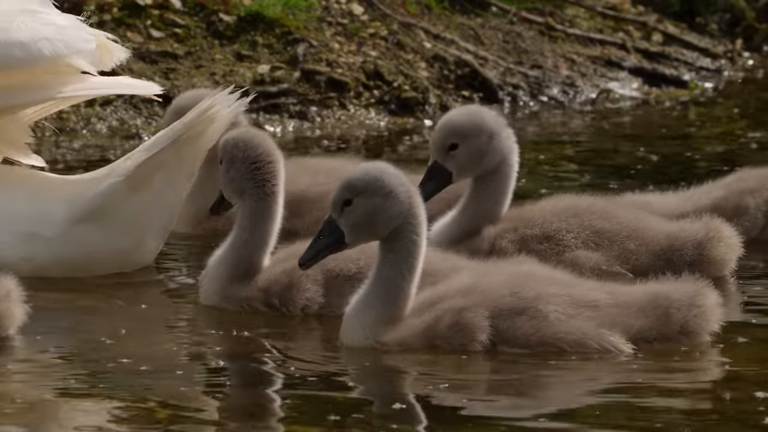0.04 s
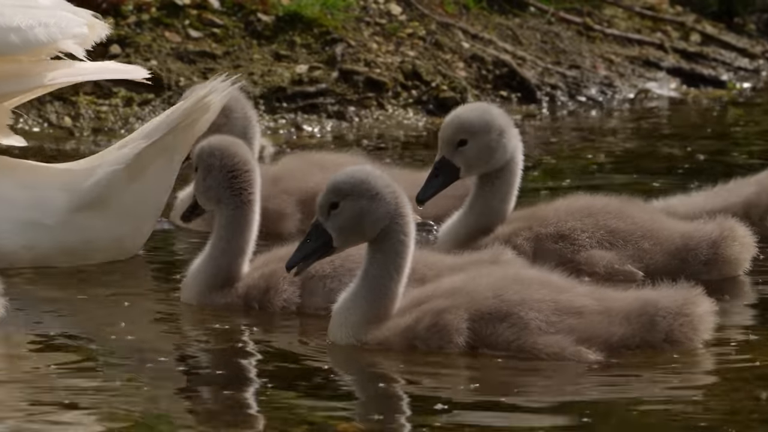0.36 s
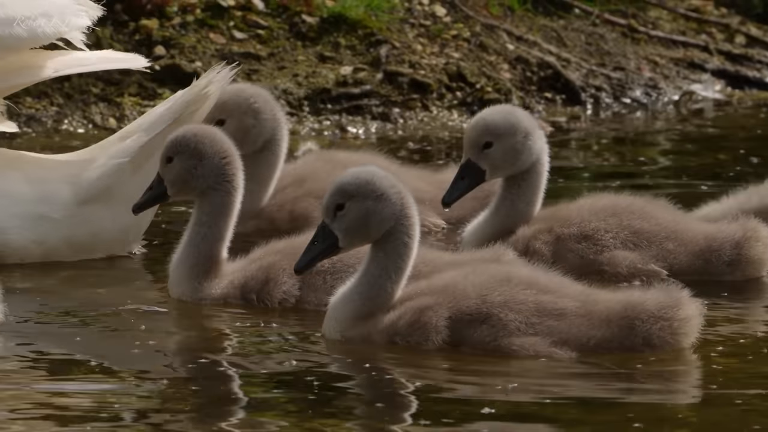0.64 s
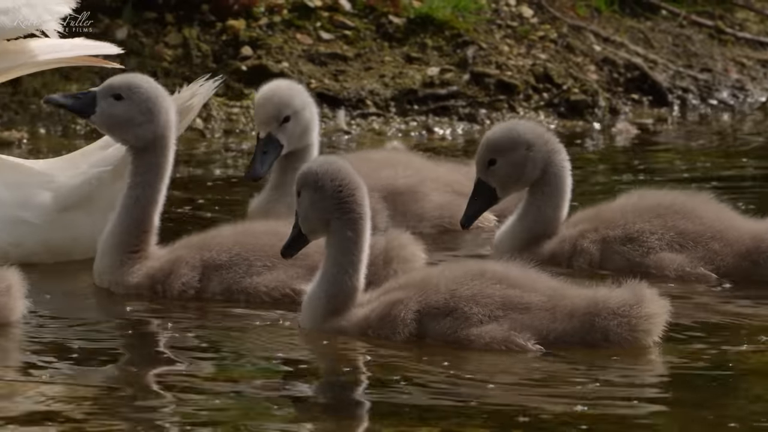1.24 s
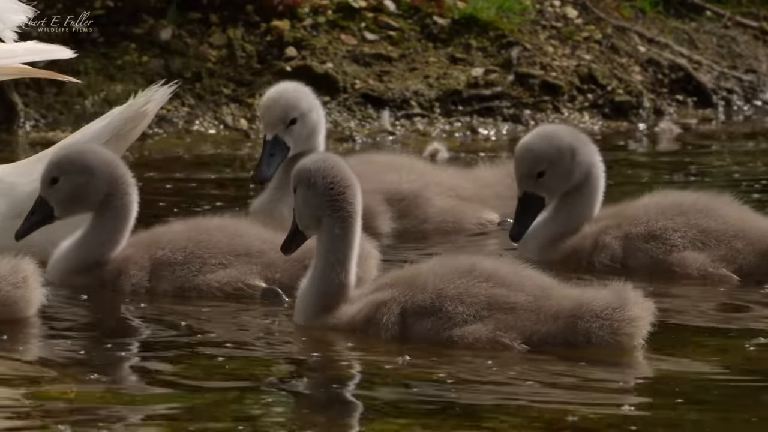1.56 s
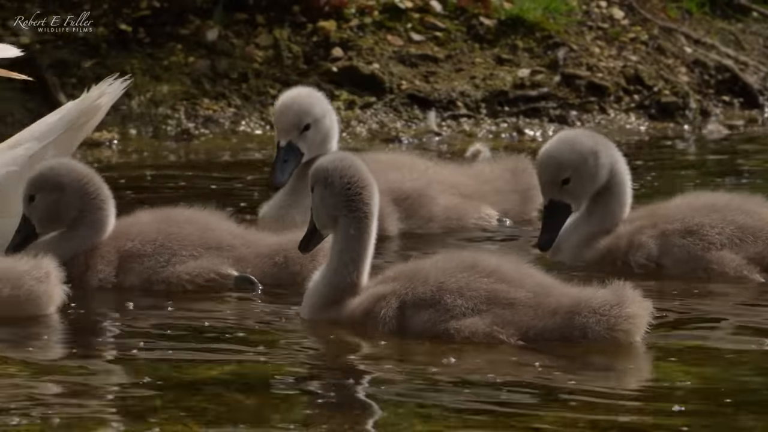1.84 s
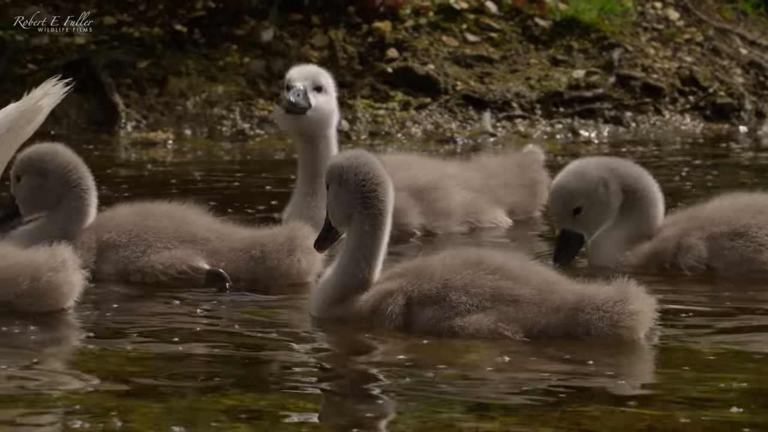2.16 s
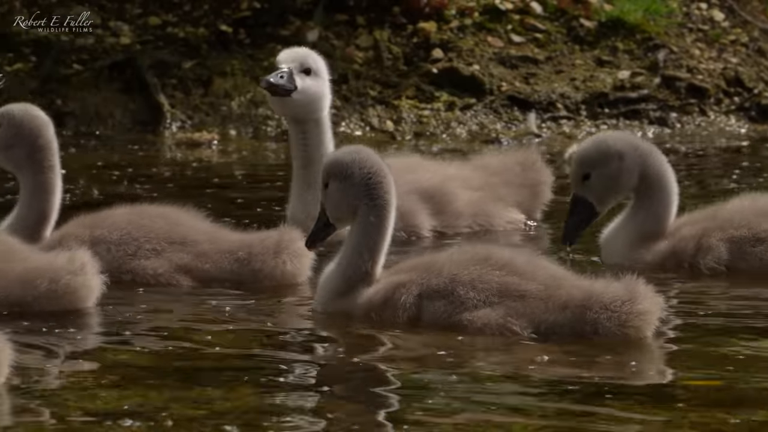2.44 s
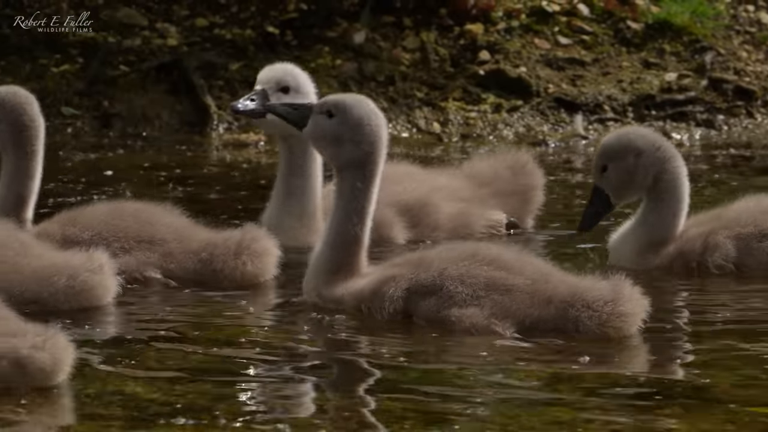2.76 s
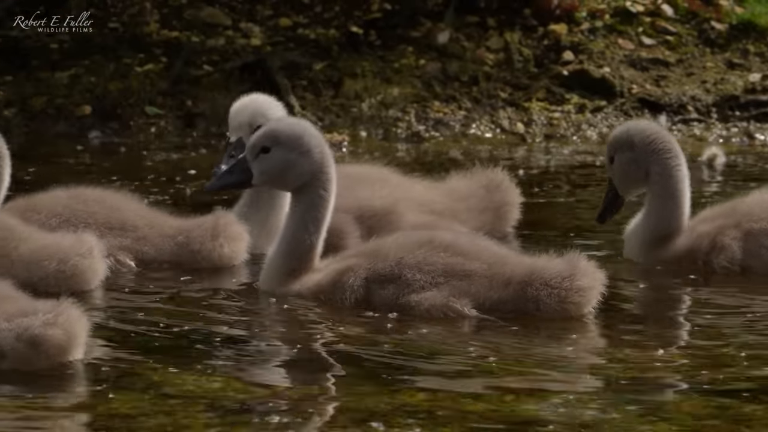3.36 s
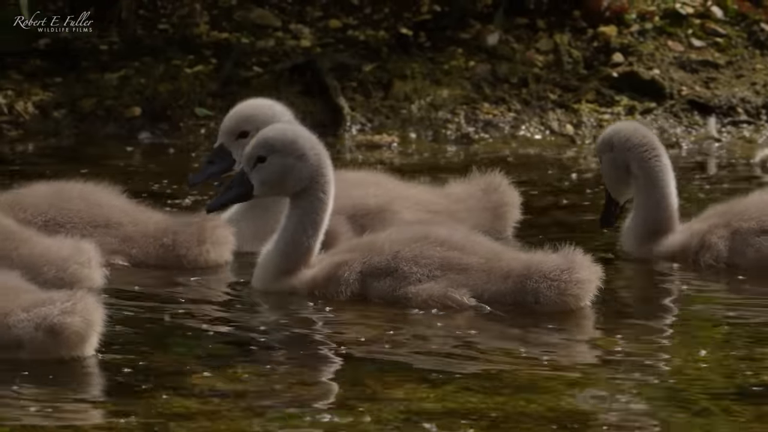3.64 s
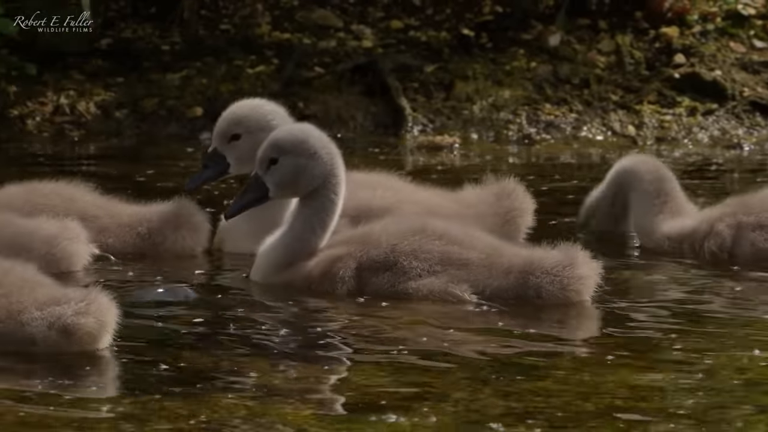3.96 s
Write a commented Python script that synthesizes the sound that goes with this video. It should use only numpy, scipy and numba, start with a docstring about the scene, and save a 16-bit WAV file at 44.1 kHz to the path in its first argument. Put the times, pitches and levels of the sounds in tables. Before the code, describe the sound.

Swan chicks peep throughout in short, high, overlapping whistles close to the microphone. An adult swan grunts twice early on, then tiny drips tick in the water. Faint distant songbirds and soft open air lie behind.

```python
"""A brood of cygnets paddles by a river bank, peeping over one another from start to end in short
arched whistles, nearly pure tones of which a few are held. In the first second an adult swan grunts
twice, as uneven pulses excite the resonance of its throat. Next some peeps crack into half tones
(subharmonics), and from 1.3 s small drips ring as bubbles. Far songbirds whistle on and off, joined
at 1.8 s by husky rising calls. The soft wash of the open air lies under it all."""
import sys
import numpy as np
from scipy import signal
from scipy.fft import rfft, irfft
from scipy.io import wavfile
from scipy.ndimage import map_coordinates
from numba import njit

SR = 44100
rng = np.random.default_rng(int(sys.argv[2]) if len(sys.argv) > 2 else 0)


def unload_wav(signal):
    """Save mono or channel-first audio to the path in sys.argv[1] as 16-bit WAV at rate SR, clipped to [-1, 1]."""
    wavfile.write(
        sys.argv[1],
        SR,
        np.round(np.clip(np.atleast_2d(signal).T, -1, 1) * 32767).astype(np.int16),
    )


N = 176400

# Arched peeps: start t/s, rise t/s, fall t/s, first f/Hz, crest f/Hz, last f/Hz, rise exponent,
# fall exponent, crest level before the swell/dB, swell/dB, second harmonic/dB, voice crack/(0-1)
PEEPS = [(0.141, 0.014, 0.069, 2410.0, 2730.0, 2010.0, 1.9, 1.9, -32.0, 10.0, -30.0, 0),
         (0.364, 0.033, 0.079, 2480.0, 2790.0, 1930.0, 3.3, 1.0, -34.0, 9.0, -22.0, 0),
         (0.61, 0.008, 0.051, 2100.0, 2650.0, 2050.0, 1.5, 1.5, -30.0, 7.0, -36.0, 0),
         (0.632, 0.027, 0.071, 2260.0, 2720.0, 1980.0, 1.8, 2.1, -36.0, 14.0, -26.0, 0),
         (0.791, 0.011, 0.052, 2340.0, 2840.0, 2380.0, 2.3, 1.3, -27.0, 5.0, -36.0, 0),
         (0.916, 0.019, 0.063, 2380.0, 2630.0, 1990.0, 2.0, 1.4, -35.0, 19.0, -27.0, 0),
         (0.977, 0.008, 0.069, 2420.0, 2920.0, 2220.0, 1.0, 2.7, -27.0, 10.0, -35.0, 0.8),
         (1.094, 0.027, 0.023, 1820.0, 1960.0, 1840.0, 1.6, 2.1, -48.0, 1.0, -33.0, 0),
         (1.156, 0.035, 0.067, 2200.0, 2940.0, 2190.0, 2.2, 2.5, -28.0, 7.0, -32.0, 0.5),
         (1.241, 0.035, 0.024, 1880.0, 2150.0, 1920.0, 1.2, 1.7, -40.0, 2.0, -36.0, 0),
         (1.358, 0.044, 0.081, 2250.0, 2940.0, 2010.0, 1.7, 2.4, -30.0, 7.0, -22.0, 1),
         (1.381, 0.047, 0.026, 1930.0, 2530.0, 1910.0, 1.0, 1.1, -35.0, -1.0, -36.0, 0),
         (1.521, 0.053, 0.028, 1880.0, 2810.0, 1920.0, 1.6, 1.5, -41.0, -7.0, -29.0, 0),
         (1.6, 0.047, 0.092, 1930.0, 2890.0, 2070.0, 2.0, 2.4, -30.0, 11.0, -26.0, 1),
         (1.669, 0.054, 0.029, 1850.0, 2830.0, 1920.0, 1.7, 1.1, -40.0, -0.0, -36.0, 0),
         (1.773, 0.01, 0.028, 2330.0, 2350.0, 2120.0, 1.6, 1.9, -50.0, 0.0, -36.0, 0),
         (1.824, 0.042, 0.032, 1860.0, 2820.0, 1850.0, 1.2, 1.7, -40.0, -6.0, -36.0, 0),
         (1.836, 0.053, 0.015, 2020.0, 2250.0, 2090.0, 1.0, 2.2, -41.0, 6.0, -36.0, 0),
         (1.943, 0.007, 0.051, 2790.0, 2960.0, 2160.0, 1.1, 1.4, -33.0, 0.0, -36.0, 0),
         (1.984, 0.084, 0.033, 2120.0, 2720.0, 2130.0, 1.9, 2.2, -35.0, 2.0, -36.0, 0),
         (2.021, 0.02, 0.044, 2130.0, 2170.0, 2000.0, 1.7, 1.8, -42.0, 11.0, -30.0, 0),
         (2.121, 0.006, 0.054, 2870.0, 3020.0, 2170.0, 1.5, 2.2, -34.0, 3.0, -25.0, 0),
         (2.178, 0.079, 0.034, 2350.0, 2800.0, 1910.0, 1.7, 2.3, -36.0, 0.0, -32.0, 0),
         (2.298, 0.006, 0.05, 2750.0, 3120.0, 2400.0, 1.0, 1.8, -31.0, 4.0, -23.0, 0),
         (2.38, 0.093, 0.031, 2180.0, 2780.0, 1880.0, 2.3, 1.4, -38.0, 5.0, -33.0, 0),
         (2.492, 0.005, 0.055, 2610.0, 3080.0, 2310.0, 1.0, 2.0, -32.0, 4.0, -23.0, 0),
         (2.543, 0.053, 0.017, 1780.0, 2030.0, 1910.0, 1.6, 2.1, -53.0, 7.0, -22.0, 0),
         (2.614, 0.061, 0.029, 2130.0, 2800.0, 1940.0, 1.7, 2.9, -50.0, 8.0, -23.0, 0),
         (2.623, 0.023, 0.025, 1900.0, 2110.0, 1920.0, 1.7, 1.6, -45.0, 2.0, -27.0, 0),
         (2.723, 0.013, 0.051, 2800.0, 2870.0, 2160.0, 1.8, 1.3, -36.0, 3.0, -36.0, 0),
         (2.732, 0.054, 0.031, 1940.0, 2720.0, 1900.0, 1.2, 1.0, -38.0, -0.0, -36.0, 0),
         (2.877, 0.05, 0.034, 1940.0, 2820.0, 1860.0, 1.1, 1.3, -41.0, -7.0, -35.0, 0),
         (2.901, 0.07, 0.027, 2000.0, 2520.0, 1860.0, 1.3, 1.8, -42.0, 3.0, -34.0, 0),
         (2.99, 0.022, 0.049, 2620.0, 3080.0, 2530.0, 2.3, 2.2, -33.0, 5.0, -32.0, 0),
         (3.003, 0.049, 0.025, 1980.0, 2200.0, 2010.0, 1.2, 1.8, -43.0, 4.0, -31.0, 0),
         (3.032, 0.042, 0.032, 2070.0, 2750.0, 1940.0, 1.4, 1.0, -42.0, 3.0, -33.0, 0),
         (3.088, 0.065, 0.033, 2010.0, 2580.0, 1970.0, 1.2, 2.8, -41.0, 2.0, -30.0, 0),
         (3.141, 0.05, 0.041, 2060.0, 2370.0, 2050.0, 1.5, 1.6, -39.0, 5.0, -32.0, 0),
         (3.164, 0.041, 0.032, 2330.0, 2540.0, 2010.0, 1.0, 1.7, -40.0, -8.0, -35.0, 0),
         (3.194, 0.052, 0.018, 2020.0, 2260.0, 1870.0, 1.1, 1.6, -44.0, 5.0, -32.0, 0),
         (3.289, 0.065, 0.04, 2010.0, 2520.0, 1950.0, 1.0, 1.9, -41.0, 3.0, -29.0, 0),
         (3.366, 0.037, 0.064, 2250.0, 2680.0, 2030.0, 2.0, 1.8, -32.0, 5.0, -23.0, 0),
         (3.477, 0.065, 0.037, 1980.0, 2710.0, 1810.0, 2.1, 1.6, -39.0, -1.0, -34.0, 0),
         (3.503, 0.071, 0.028, 1890.0, 2510.0, 1900.0, 1.2, 1.1, -47.0, -1.0, -27.0, 0),
         (3.542, 0.057, 0.061, 2090.0, 2600.0, 2000.0, 1.2, 1.6, -34.0, 7.0, -26.0, 0),
         (3.607, 0.028, 0.063, 2450.0, 2750.0, 2070.0, 2.1, 1.8, -30.0, 4.0, -22.0, 0),
         (3.66, 0.059, 0.037, 2060.0, 2740.0, 1890.0, 2.2, 1.0, -36.0, 5.0, -33.0, 0),
         (3.79, 0.049, 0.009, 2040.0, 2510.0, 2380.0, 1.3, 2.0, -54.0, 1.0, -29.0, 0),
         (3.842, 0.037, 0.065, 2410.0, 2760.0, 1950.0, 3.2, 1.5, -31.0, 5.0, -18.0, 0),
         (3.846, 0.063, 0.029, 1970.0, 2740.0, 2150.0, 1.8, 1.4, -35.0, -2.0, -36.0, 0)]
# Held whistles: second harmonic/dB, lift of the higher harmonics/dB, curve of (t/s, f/Hz, level/dB)
HELD_WHISTLES = [(-26, -3, [(-0.002, 2976, -27), (0.037, 3050, -27), (0.086, 3154, -23), (0.099, 3029, -26),
                 (0.111, 2779, -28), (0.123, 2069, -51)]), (-28, 1, [(0.24, 2521, -36), (0.252, 2881, -31),
                 (0.281, 3331, -29), (0.303, 3221, -20), (0.323, 3062, -26), (0.37, 3163, -20),
                 (0.401, 3100, -24), (0.426, 2781, -29)]), (-24, -3, [(1.282, 2074, -42), (1.31, 2579, -35),
                 (1.347, 2862, -29), (1.389, 2638, -28), (1.44, 2796, -25), (1.47, 2738, -27),
                 (1.482, 2552, -33), (1.491, 1941, -49)]), (-19, -5, [(2.08, 2384, -45), (2.1, 2654, -38),
                 (2.121, 2821, -34), (2.157, 2692, -29), (2.228, 2644, -30), (2.244, 2010, -50)]),
                 (-34, 1, [(3.233, 2535, -45), (3.258, 2979, -40), (3.275, 3228, -32), (3.316, 3012, -27),
                 (3.349, 2824, -34), (3.393, 2164, -48)]), (-27, -2, [(3.24, 2350, -52), (3.285, 2764, -32),
                 (3.306, 2730, -31), (3.32, 2590, -34), (3.349, 2536, -31), (3.374, 2431, -44),
                 (3.399, 2109, -41)])]
# Harmonics 3 to 5 of a whistle: base level/dB
UPPER_HARMONICS_DB = [-34, -41, -50]
# Half tones at 1/2, 3/2, ... of the pitch: level in a full crack/dB
HALF_TONES_DB = [-18, -32, -39, -49, -48, -54]
# Grunts: rasp/dB, curve of (t/s, f/Hz, level/dB, throat resonance f/Hz, chest tone/dB, roughness/(0-1))
GRUNTS = [ (-16, [(.393, 250, -36, 750, 4, .4), (.404, 262, -28, 1250, 1, .3),
          (.422, 286, -29, 1300, 0, .4), (.436, 320, -28, 600, -15, .7), (.458, 318, -31, 640, -6, .4),
          (.475, 255, -36, 680, -6, .5), (.488, 220, -42, 430, -8, .2), (.543, 165, -50, 520, -10, .6)]),
          (-19, [(.705, 145, -45, 620, -8, .7), (.73, 178, -36, 880, -5, .45),
          (.752, 190, -33, 930, -5, .35), (.772, 210, -34, 850, -4, .4), (.792, 216, -38, 620, -2, .35),
          (.815, 185, -46, 600, -5, .7), (.845, 135, -53, 420, -4, .9)])]
# Spectrum of the swan's rasping breath: f/Hz, level/dB
RASP_SPECTRUM = [(200, -8), (700, -4), (1500, -5), (2400, 0), (4000, -2), (5800, -18), (8300, -9),
                 (10500, -26), (12500, -22), (16000, -35)]
# Drips and beak dabs: t/s, f/Hz, time to decay by 60 dB/s, level/dB
DRIPS = [(1.333, 6500, .006, -46), (1.545, 3500, .008, -45), (1.863, 5500, .004, -44),
         (1.886, 3500, .008, -42), (1.937, 1200, .03, -43), (1.95, 3100, .03, -33),
         (2.113, 8000, .004, -44), (2.718, 1150, .04, -42), (3.147, 6500, .004, -48),
         (3.272, 3500, .012, -36), (3.528, 1340, .04, -47), (3.7, 1380, .05, -46), (3.99, 5000, .006, -44)]
# Thin songbird notes: curves of (t/s, f/Hz, level/dB)
SONG_NOTES = [
    [(.122, 5100, -58), (.131, 4050, -52), (.16, 4400, -54), (.19, 4350, -56), (.222, 3600, -60)],
    [(.241, 4600, -53), (.268, 3850, -56)],
    [(.455, 3260, -60), (.48, 3265, -51), (.53, 3265, -50), (.55, 3260, -63)],
    [(.472, 4750, -60), (.484, 4500, -52), (.505, 4720, -55), (.522, 4700, -55), (.533, 3900, -56),
     (.546, 3640, -53), (.565, 3420, -66)],
    [(.845, 4750, -62), (.851, 4000, -57), (.862, 3580, -52), (.885, 3380, -58), (.925, 3250, -68)],
    [(1.895, 4300, -62), (1.945, 4500, -64)],
    [(1.48, 3700, -61), (1.57, 3620, -63)],
    [(2.555, 4280, -60), (2.62, 4400, -61)],
    [(2.76, 3950, -64), (2.86, 4200, -62)],
    [(3.16, 4750, -59), (3.185, 4900, -56), (3.2, 4450, -60)],
]
# Husky rising bird calls: curves of (t/s, f/Hz, level/dB)
HUSKY_CALLS = [
    [(1.83, 2980, -60), (1.87, 3230, -54), (1.89, 3400, -60)],
    [(1.99, 3050, -59), (2.03, 3500, -53), (2.07, 3750, -59)],
    [(2.22, 2980, -57), (2.26, 3330, -53), (2.29, 3550, -60)],
    [(2.62, 3020, -59), (2.66, 3450, -55), (2.72, 3950, -59)],
    [(2.97, 3350, -58), (3.03, 3700, -55), (3.08, 4130, -60)],
]
# Spectrum of the low wash of air: f/Hz, level/dB
WASH_SPECTRUM = [(20, -4), (55, 0), (170, 0), (300, -3), (600, -6), (1200, -10), (1900, -15)]
# Spectrum of the faint hiss: f/Hz, level/dB
HISS_SPECTRUM = [(1000, -20), (1800, -5), (3000, -1), (4200, -1), (5000, -11), (7000, -18), (10000, -19),
                 (15500, -20)]

EFFORT_DB_PER_HZ = .012  # a higher note is pushed harder
DULLING_DB_PER_HZ, STRAIN_DB = .014, 2  # overtones fade below the crest and flare in a crack
SCOOP, SCOOP_S, DROP, DROP_S = .1, .0015, .06, .003  # pitch scoops up at onset, collapses at release
JITTER, SHIMMER_DB, FLUTTER_PER_S = .005, 1.0, 260
WOBBLE_DB, WOBBLE_PER_S = 1.1, 55  # unsteady push within a call
CRACK_DELAY_S, CRACK_WIDTH_S = .019, .021  # the crack follows the crest
BREATH_DB, BREATH_PER_S = -31, 1800  # noise that clings to the tone
BEAK_HZ, BEAK_WIDTH_HZ, BEAK_DB = 8200, 600, 6  # resonance that picks out the third harmonic
HOARSE_DB, GRUNT_JITTER, GRUNT_SHIMMER_DB = -1, .09, 4.5  # turbulence, uneven cycles at full roughness
THROAT_WIDTH_HZ, MOUTH_HZ, MOUTH_WIDTH_HZ, MOUTH_DB, GRUNT_TOP_HZ = 620, 1400, 400, -2, 1650


def cygnet(hz, db, second_db, crack=0, lift_db=0):
    """Harmonic series: a nearly pure whistle; in a crack, period doubling adds half tones."""
    n = len(hz)
    t = np.arange(n) / SR
    glide = 1 - SCOOP * np.exp(-t / SCOOP_S) - DROP * np.exp(-t[::-1] / DROP_S)
    pitch = hz * glide * (1 + JITTER * wander(n, FLUTTER_PER_S))
    phase = 2 * np.pi * np.cumsum(pitch) / SR
    doubling = crack * np.exp(-((t - t[np.argmax(hz)] - CRACK_DELAY_S) / CRACK_WIDTH_S) ** 2)
    bright_db = DULLING_DB_PER_HZ * (hz - hz.max()) + STRAIN_DB * doubling
    tone = np.sin(phase) + undb(BREATH_DB) * wander(n, BREATH_PER_S) * np.cos(phase)
    # the upper harmonics partly follow the strength of the second
    upper_db = [base_db + lift_db + .42 * second_db for base_db in UPPER_HARMONICS_DB]
    for k, overtone_db in enumerate([second_db] + upper_db, 2):
        flicker_db = 2.2 * wander(n, FLUTTER_PER_S / 2) + 2 * wander(n, per_s=45)
        blur_rad = .09 * k * wander(n, 2 * FLUTTER_PER_S)
        tone += undb(bright_db + overtone_db + flicker_db) * np.sin(k * phase + blur_rad)
    for k, half_db in enumerate(HALF_TONES_DB):
        tone += doubling * undb(half_db) * np.sin((k + .5) * phase + .5 * wander(n, FLUTTER_PER_S))
    effort_db = db + EFFORT_DB_PER_HZ * (pitch - hz)
    unsteady_db = SHIMMER_DB * wander(n, FLUTTER_PER_S) + WOBBLE_DB * wander(n, WOBBLE_PER_S)
    return np.sqrt(2) * tone * gate(n) * undb(effort_db + unsteady_db)


def brood(release_lag_s=.003):
    """Coupled frequency and amplitude modulation: peeps grow louder as they arch; the beak resonates."""
    out = np.zeros(N)
    for (start, rise, fall, first_hz, crest_hz, last_hz, rise_bend, fall_bend,
         db, swell_db, second_db, crack) in PEEPS:
        t = np.arange(0, rise + fall + release_lag_s, 1 / SR)
        to_climb_hz = (crest_hz - first_hz) * np.clip(1 - t / rise, 0, 1) ** rise_bend
        fallen_hz = (crest_hz - last_hz) * np.clip((t - rise) / fall, 0, 1) ** fall_bend
        hz = crest_hz - to_climb_hz - fallen_hz
        effort_db = db + EFFORT_DB_PER_HZ * (hz - crest_hz) + swell_db * (t / (rise + fall) - .5)
        add(out, start, cygnet(hz, effort_db, second_db, crack))
    for second_db, lift_db, curve in HELD_WHISTLES:
        start, hz, db = follow(curve)
        add(out, start, cygnet(hz, db, second_db, lift_db=lift_db))
    return out + undb(BEAK_DB) * resonate(out, np.full(N, BEAK_HZ), BEAK_WIDTH_HZ)


def swan():
    """Source and filter: uneven pulses and turbulence ring the long throat as it opens and closes."""
    out = np.zeros(N)
    lowpass = signal.butter(8, GRUNT_TOP_HZ, fs=SR, output="sos")
    for rasp_db, curve in GRUNTS:
        start, hz, db, throat_hz, chest_db, rough = follow(curve)
        n = len(hz)
        cycles = np.cumsum(hz * (1 + GRUNT_JITTER * rough * wander(n, per_s=400))) / SR
        cycle_starts = np.diff(np.floor(cycles), prepend=-1)
        pulses = unit(cycle_starts * undb(GRUNT_SHIMMER_DB * rough * wander(n, per_s=400)))
        puff = np.exp(-(cycles % 1) / .6)  # air escapes once a cycle
        source = pulses + undb(HOARSE_DB) * rough * unit(puff * rng.standard_normal(n))
        throat = unit(resonate(resonate(source, throat_hz, THROAT_WIDTH_HZ), throat_hz, THROAT_WIDTH_HZ))
        mouth = unit(resonate(source, np.full(n, MOUTH_HZ), MOUTH_WIDTH_HZ))
        voice = unit(signal.sosfilt(lowpass, throat + undb(MOUTH_DB) * rough * mouth))
        chest = np.sqrt(2) * (np.sin(2 * np.pi * cycles) + undb(-9) * np.cos(4 * np.pi * cycles))
        voiced = (voice + undb(chest_db) * chest) / np.hypot(1, undb(chest_db))
        breath = noise(RASP_SPECTRUM)[:n] * np.sqrt(puff) * rough ** .15
        grain_db = 2 * wander(n, per_s=300)
        rasp = unit(breath * undb(grain_db))
        add(out, start, (voiced + undb(rasp_db) * rasp) * undb(db) * gate(n))
    return out


def drips(splash_db=-13, splash_s=.002):
    """Damped oscillation: each drip is a tiny splash and the short ring of a bubble."""
    out, t = np.zeros(N), np.arange(SR // 10) / SR
    for start, hz, t60, db in DRIPS:
        onset = 1 - np.exp(-t * hz / 2)
        ring = np.sin(2 * np.pi * hz * t) * np.exp(-np.log(1000) * t / t60) * onset
        burst = rng.standard_normal(len(t)) * np.exp(-t / splash_s)
        splash = resonate(burst, np.full(len(t), hz), hz / 2)
        add(out, start, undb(db) * (ring + undb(splash_db) * splash))
    return out


def songbirds(song_waver=.011, husky_waver=.042):
    """Random frequency modulation: a slight waver leaves a whistle thin, a deeper one makes it husky."""
    out = np.zeros(N)
    for notes, waver in (SONG_NOTES, song_waver), (HUSKY_CALLS, husky_waver):
        for curve in notes:
            start, hz, db = follow(curve)
            pitch = hz * (1 + waver * wander(len(hz), per_s=600))
            phase = 2 * np.pi * np.cumsum(pitch) / SR
            add(out, start, np.sqrt(2) * np.sin(phase) * undb(db) * gate(len(hz)))
    return out


def bank_echoes(x, t60_s, delay_s=.008):
    """Reverberation: diffuse reflections from the bank and trees decay exponentially."""
    t = np.arange(SR) / SR
    tail = rng.standard_normal(SR) * np.exp(-np.log(1000) * t / t60_s) * (t > delay_s)
    return signal.fftconvolve(x, tail / np.linalg.norm(tail))[:N]


def open_air(wash_db=-54.5, hiss_db=-61, swell_db=.8):
    """Amplitude-modulated noise: a low wash and a faint hiss, both swelling gently."""
    wash = undb(wash_db + swell_db * wander(N, per_s=6)) * noise(WASH_SPECTRUM)
    hiss = undb(hiss_db + swell_db * wander(N, per_s=8)) * noise(HISS_SPECTRUM)
    return wash + hiss


@njit
def resonate(x, hz, width_hz):
    """Second-order resonance: a band-pass with a moving centre."""
    y, band_state, low_state = np.empty(len(x)), 0., 0.
    for i in range(len(x)):
        tuning, damping = np.tan(np.pi * hz[i] / SR), width_hz / hz[i]
        band = (band_state + tuning * (x[i] - low_state)) / (1 + tuning * (tuning + damping))
        band_state = 2 * band - band_state
        low_state += 2 * tuning * band
        y[i] = damping * band
    return y


def noise(spectrum):
    """Spectral shaping: noise of rms 1 coloured by (f/Hz, level/dB) points, rolled off at the last."""
    hz, db = np.array(spectrum, float).T
    f = np.maximum(np.arange(N // 2 + 1) * SR / N, 1)
    gain = undb(np.interp(np.log(f), np.log(hz), db)) / np.sqrt(1 + (f / hz[-1]) ** 20)
    return unit(irfft(rfft(rng.standard_normal(N)) * gain, N))


def wander(count, per_s):
    """Smooth random modulation of spread near 1, changing about per_s times a second."""
    points = rng.standard_normal(4096)
    return 1.1 * map_coordinates(points, [np.arange(count) * per_s / SR], order=2, mode="wrap")


def gate(count, attack_s=.002, release_s=.011):
    """Amplitude envelope: attack, hold and release of a call."""
    t = np.arange(count) / SR
    return np.sin(np.pi / 2 * np.clip(np.minimum(t / attack_s, t[::-1] / release_s), 0, 1)) ** 2


def follow(curve):
    """Linear interpolation: the start time and per-sample columns of a curve."""
    times, *columns = np.array(curve, float).T
    t = np.arange(times[0], times[-1], 1 / SR)
    return times[0], *(np.interp(t, times, column) for column in columns)


def add(out, start, sound):
    """Superposition: mix a sound in at its start time."""
    i = max(int(start * SR), 0)
    out[i:i + len(sound)] += sound[:max(N - i, 0)]


def undb(db):
    """Decibels to amplitude ratio."""
    return 10 ** (np.asarray(db) / 20)


def unit(x):
    """Normalisation to rms 1."""
    return x / np.sqrt(np.mean(x ** 2) + 1e-20)


def scene():
    """Direct-to-reverberant ratio: the near swans are almost dry, the far birds blurred by the trees."""
    near = brood() + swan() + drips()
    far = songbirds()
    echoes = undb(-26) * bank_echoes(near, t60_s=.4) + undb(-4) * bank_echoes(far, t60_s=.5)
    return (near + far + echoes + open_air())[None]


def record(dry, top_hz=15700):
    """Band limiting: a steep low-pass cuts the highest treble."""
    return signal.sosfilt(signal.ellip(10, .1, 70, top_hz, fs=SR, output="sos"), dry)


dry = scene()
out = record(dry)
unload_wav(out)
```